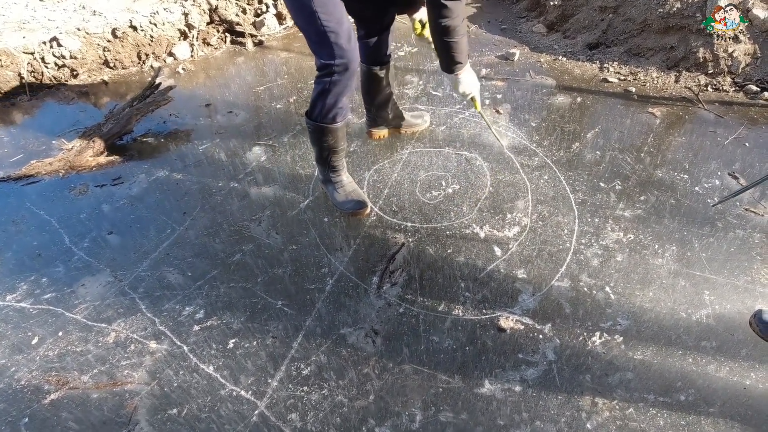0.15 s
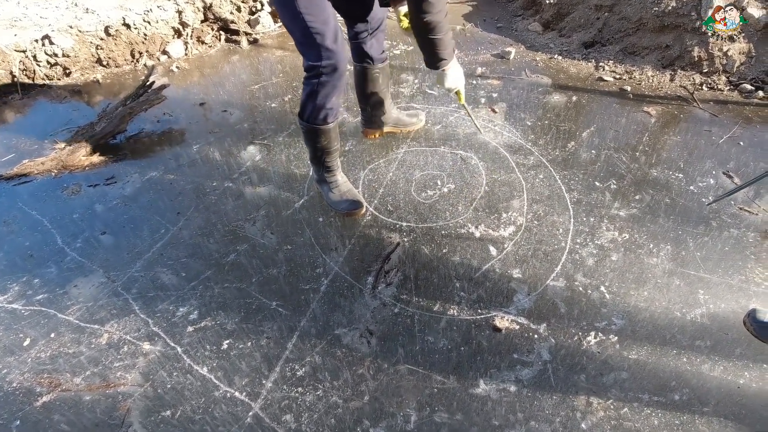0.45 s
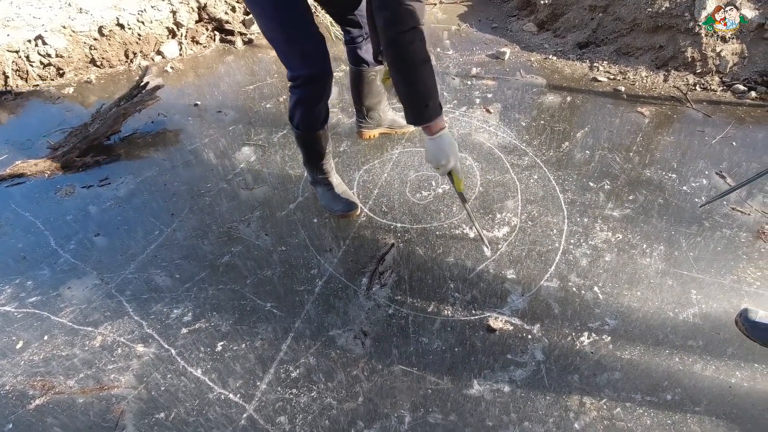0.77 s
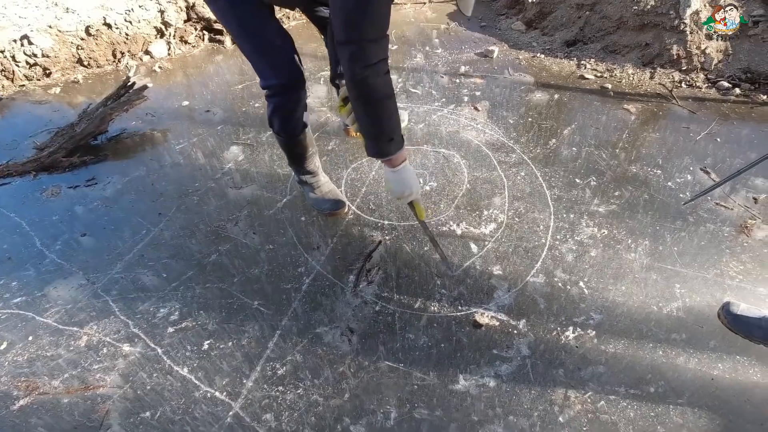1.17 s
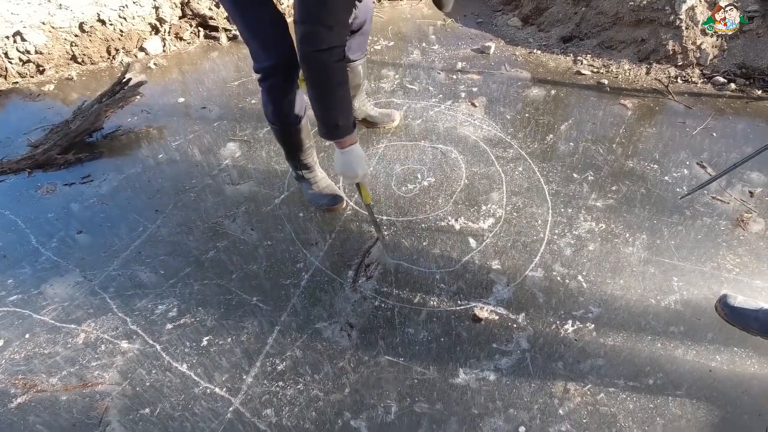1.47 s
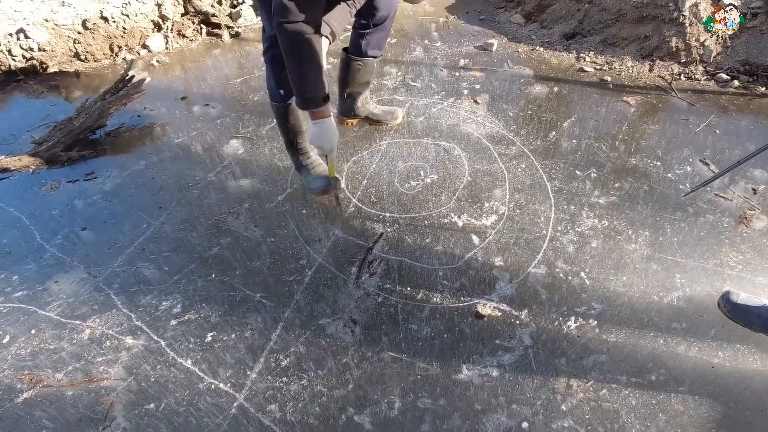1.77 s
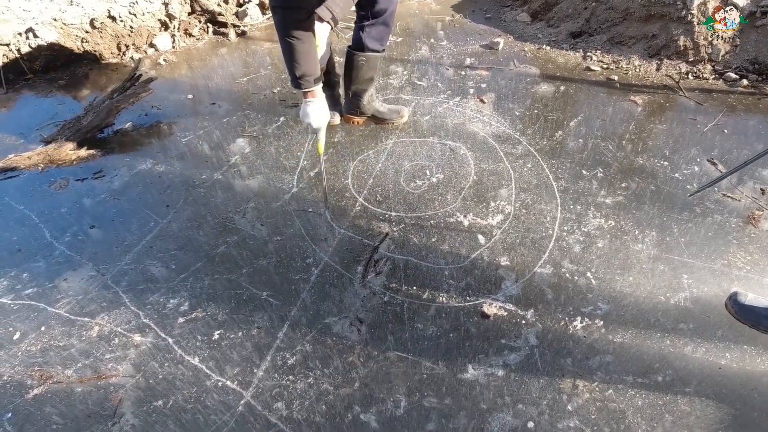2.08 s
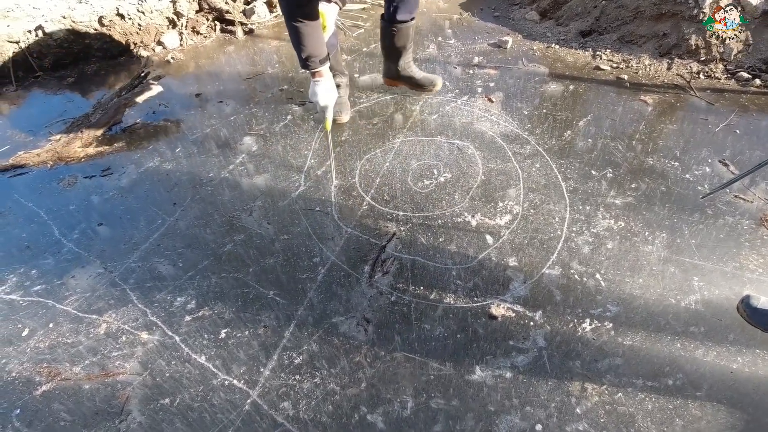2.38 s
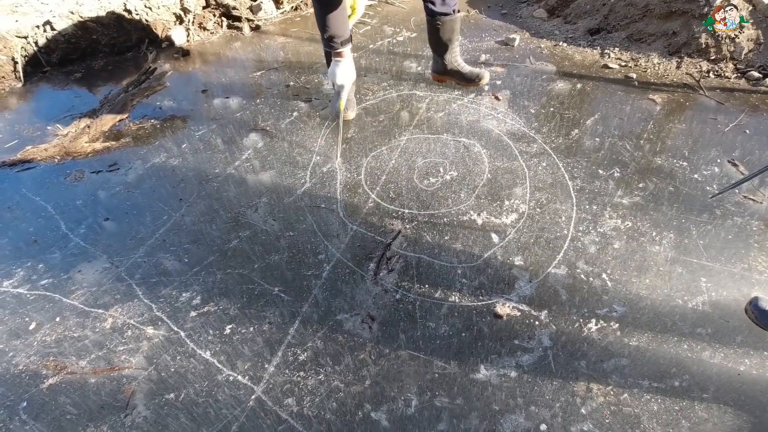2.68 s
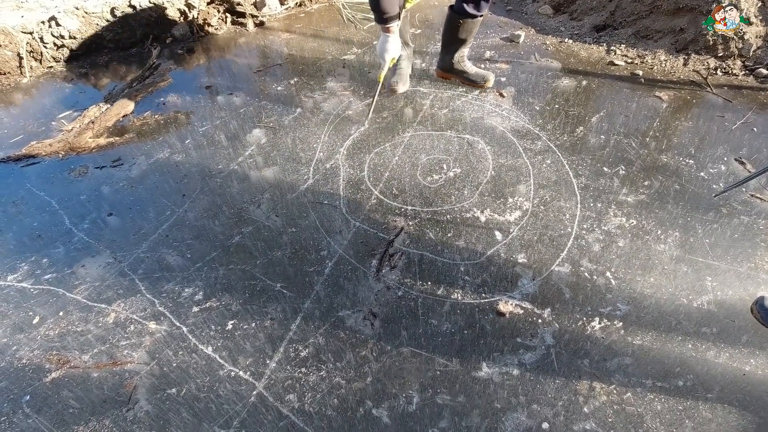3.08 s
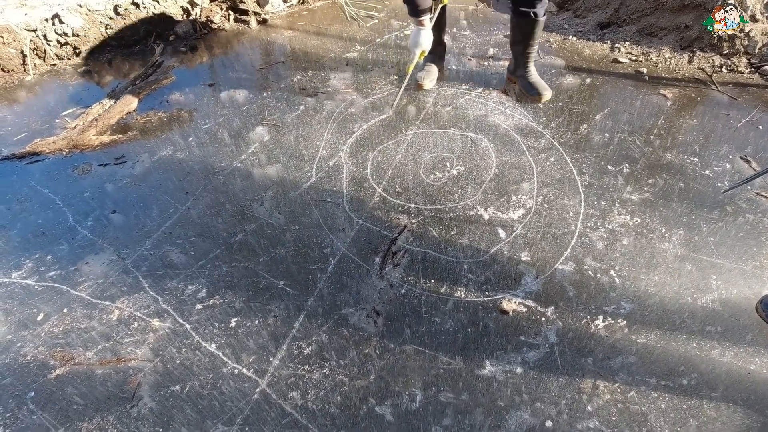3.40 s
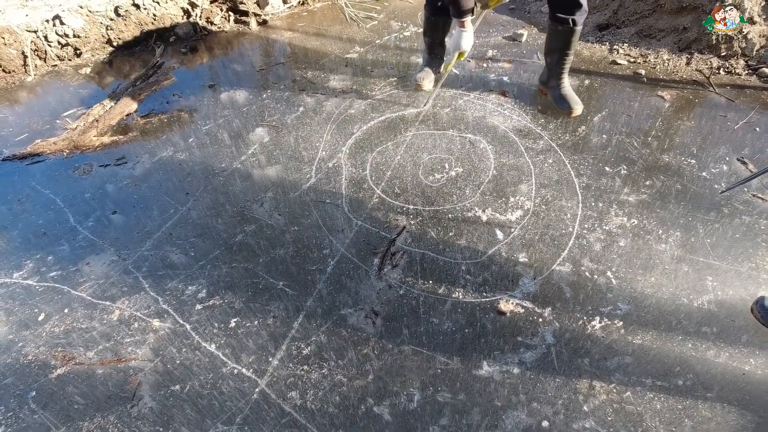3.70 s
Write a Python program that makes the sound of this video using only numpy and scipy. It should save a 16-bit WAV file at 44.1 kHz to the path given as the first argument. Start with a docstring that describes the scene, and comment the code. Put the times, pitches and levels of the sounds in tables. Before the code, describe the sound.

A metal rod rasps over pond ice in a short stuttering stroke, pauses, then scrapes again and runs into a long stroke, with sharp catches and boot thuds; outdoors, microphone a few metres away.

```python
"""Metal rod scoring a circle into pond ice in three strokes, outdoors, a few metres away.
Rasp: random grain fractures, partly gated into quick skips, through rod-and-ice resonances; hard catches on top.
Sheet: low-filtered fractures. Boots: filtered noise thuds and one falling heel knock.
Around it: two decaying noise echoes of the rod, light wind, distant air and faint gurgling sine blips."""
import sys
import numpy as np
from scipy import signal
from scipy.fft import rfft, irfft
from scipy.io import wavfile
from scipy.ndimage import uniform_filter1d

SR = 44100
rng = np.random.default_rng(int(sys.argv[2]) if len(sys.argv) > 2 else 0)


def to_wav(sig):
    """Store sig (one row per channel, or 1-D mono) as 16-bit WAV at the path in sys.argv[1].

    Samples outside -1..1 are clipped; the rate is SR.
    """
    pcm = np.clip(np.atleast_2d(sig), -1, 1) * 32767
    pcm = np.round(pcm).astype(np.int16)
    wavfile.write(sys.argv[1], SR, pcm.T)  # frames by channels


N = 169785
TIME_S = np.arange(N) / SR
FFT_SIZE, HOP = 2048, 512
HZ = np.fft.rfftfreq(FFT_SIZE, 1 / SR)
FULL_HZ = np.fft.rfftfreq(N, 1 / SR)
FRAME_S = np.arange(-(-N // HOP) + 1) * HOP / SR

# rasp, one table per stroke: t/s, level/dB, treble relative to it/dB
STROKE_LEVELS = [
    [(0.0, -27.5, -15), (0.006, -28.5, -0.5), (0.106, -26.5, -7), (0.194, -22, -1), (0.208, -27, -2),
     (0.234, -30, -6), (0.25, -18.5, -7), (0.316, -22, -5.5), (0.322, -27, -7), (0.36, -24, 0.5),
     (0.39, -31.5, 2), (0.396, -31.5, -2), (0.446, -29, 0), (0.48, -25, -10), (0.53, -63.5, 4)],
    [(1.218, -37, -28), (1.232, -37.5, -14), (1.242, -44, -9), (1.26, -28, -8), (1.274, -53, -4),
     (1.292, -31.5, -6), (1.394, -24.5, -3), (1.576, -30.5, -1.5), (1.71, -27.5, -2.5), (1.716, -22.5, 9.5),
     (1.736, -55, 4), (1.76, -53, 4)],
    [(1.79, -54, 6), (1.82, -29.5, -4.5), (1.85, -33, -2), (1.89, -27, -2), (2.05, -32.5, -5),
     (2.06, -35, -4), (2.19, -32.5, -5), (2.24, -37.5, -0.5), (2.33, -26.5, -5), (2.34, -31.5, 0),
     (2.48, -30.5, -6), (2.49, -26, -4), (2.62, -34, 3), (2.7, -27.5, -7), (2.8, -28.5, -5),
     (2.9, -24.5, -7.5), (3.03, -27, -8), (3.14, -24.5, -6.5), (3.33, -30, -7), (3.41, -23.5, -6.5),
     (3.47, -30.5, -4), (3.5, -22.5, -13), (3.51, -25, -8.5), (3.71, -25, -1.5), (3.72, -29, 1.5),
     (3.85, -28, -1)],
]
# low drone of the ice sheet under the tip: t/s, level/dB
DRONE_LEVEL = [(0, -39), (.09, -43), (.3, -43), (.48, -48), (.56, -65.5), (1.2, -67), (1.24, -46),
               (1.36, -41), (1.71, -37), (1.77, -58), (1.83, -41), (2.25, -41.5), (2.9, -39.5), (3.85, -40)]
# share of the rasp's power in skips: t/s, share/0-1
SKIP_SHARE = [(0, 0.8), (.42, .95), (.49, 0.6), (1.3, .55), (1.42, 0.36), (1.62, 0.67), (1.9, 0.3),
              (2.05, .15), (2.2, 0.52), (2.4, .5), (2.6, .92), (2.76, .38), (2.95, .25), (3.17, .42),
              (3.25, 0.79), (3.5, 0.76), (3.64, 0.63), (3.8, 0.86)]
# tip on its circle: t/s, place/0 right - 1 left
TIP_PLACE = [(0, 0.018), (.5, 0.087), (1.25, .2), (1.65, 0.55), (2.1, 1), (2.8, 0.88), (3.3, 0.78),
             (3.6, 0.23), (3.85, 0.18)]
# rasp colour at the right of the circle: f/Hz, level/dB
RIGHT_COLOUR = [(500, -25), (1000, -7.5), (1400, -2), (3000, -2), (4600, -3.5), (5700, -2.5), (6450, -0.5),
                (7100, -7.5), (8200, -13.5), (9300, -5), (10400, -1), (11500, -9), (13000, -13),
                (16000, -18.5)]
# rasp colour at the left of the circle: f/Hz, level/dB
LEFT_COLOUR = [(500, -19), (950, -8), (1200, -1), (2700, 0), (3900, 0), (4800, -2), (6200, -6),
               (7200, -15.5), (9000, -18), (10000, -13.5), (11000, -6), (12000, -13), (13600, -13),
               (16000, -23.5)]
# steady ringing of rod on ice: f/Hz, width/Hz, lift/dB
ROD_RINGS = [(1154, 50, 0), (1506, 30, 1), (1762, 17, -2), (2000, 60, 3.5), (2680, 50, 2), (3000, 74, 2.5),
             (3830, 70, 3), (5380, 60, 2.5), (6470, 150, 0)]
# passing resonances as grip and angle change: t/s, spread/s, f/Hz, width/Hz, lift/dB, glide/(Hz/s)
PASSING_RINGS = [(.2, .3, 6400, 350, 7, 2.5), (.27, .09, 3160, 900, 6.5, 0),
                 (0.485, 0.036, 3860, 350, 15.5, 2), (1.692, .06, 3000, 300, 10, -1),
                 (1.876, 0.1, 1190, 180, 12.5, 2), (1.948, 0.082, 2110, 250, 5, 0),
                 (2.33, 0.044, 3450, 300, 10, 0), (2.62, 0.29, 2540, 220, 3, 0),
                 (3.02, 0.41, 2690, 260, 7, 750), (3.42, 0.098, 2950, 350, 5.5, 0),
                 (2.87, 0.24, 5370, 120, 6, 0), (3.703, .16, 5550, 500, 10, 3000),
                 (3.63, 0.11, 1680, 260, 5.5, 1200)]
# ice sheet resonances: f/Hz, relative level/dB
SHEET_COLOUR = [(40, -25.5), (90, -6), (130, -6), (200, -12), (270, -10.5), (320, 1), (395, 1.5), (470, -4),
                (650, -3), (900, -7), (1400, -10.5), (4000, -63.5)]
# left-right correlation: f/Hz, likeness/0-1
STEREO_LIKENESS = [(60, 0.98), (150, 0.98), (350, 0.99), (600, 0.95), (1200, .98), (2500, 1), (4500, 0.61),
                   (6500, 0.65), (8000, .45), (10500, 0.96), (13000, .5), (16000, .45)]
# tip catches and breaks out a chip: t/s, relative strength/dB
CHIP_CATCHES = [(0.0887, -7), (0.0957, -10), (0.189, -6), (0.1995, -6), (0.2369, -5.5), (0.2506, -1.5),
                (0.263, -6), (0.2666, -9.5), (0.2787, -8.5), (0.3015, -11), (0.3419, -9.5), (0.3634, -9),
                (0.3758, -11.5), (0.4329, -12), (0.476, -15), (1.13, -32), (1.22, -27), (1.256, -14.5),
                (1.5334, -9.5), (1.715, -7.5), (2.4897, -11), (2.5163, -13.5), (2.545, -13), (2.5643, -10),
                (2.6098, -10.5), (2.6493, -12.5), (3.222, -15), (3.236, -11), (3.4047, -3.5),
                (3.4183, -8.5), (3.48, -9), (3.5397, -3), (3.5608, -10.5), (3.785, -6)]
# boots on the ice: t/s, level/dB, f/Hz, width/Hz, rise/s
BOOT_STEPS = [(0.074, -28, 662, 400, 0.011), (0.571, -30, 60, 60, 0.0057), (0.647, -34.5, 712, 130, 0.0067),
              (2.103, -29, 380, 400, 0.0041), (2.22, -32, 59.4, 70, 0.011), (2.729, -22, 80, 149, 0.0086),
              (3.309, -26, 600, 900, 0.0033)]
# distant air: f/Hz, relative level/dB
AIR_COLOUR = [(60, -17), (110, -4.5), (190, -10), (260, -5), (370, -2), (540, -13), (900, -10), (1250, -21),
              (1900, -24), (3900, -30), (6000, -35.5), (9000, -45), (12500, -52), (16000, -65.5)]
# wind: f/Hz, relative level/dB
WIND_COLOUR = [(15, -1.5), (35, 2), (70, -4.5), (120, -15), (250, -30), (800, -73.5)]
# wind strength: t/s, level/dB
WIND_STRENGTH = [(0, -41), (.45, -42), (.7, -51), (1.2, -50), (1.5, -62), (2.1, -53.5), (2.5, -41),
                 (2.85, -46), (3.28, -46.5), (3.35, -35), (3.42, -53), (3.54, -42), (3.65, -54.5)]
# reflections: f/Hz, relative level/dB
REFLECTION_COLOUR = [(300, 0.5), (3500, -1.5), (7000, -4.5), (15000, -18)]

GRAINS_PER_S, GRAIN_SPREAD_DB, GRAIN_CAP = 14000, 3.5, 4.76  # cap in multiples of the spread
SPLINTERS_PER_S, SPLINTER_DB = 45, 14  # sharp snaps, relative to grain rms
SKIPS_PER_S, SKIP_JITTER, SKIP_WIDTH_S, SKIP_SPREAD_DB = 112, 0.24, 0.0012, 2
RIPPLE_DB, RIPPLE_HZ, RIPPLE_S = 1.8, 90, 0.19  # fine colour ripple, drifting as the tip moves
PATCH_DB, PATCH_HZ, PATCH_S = 2.0, 460, 0.081  # broader, quicker contact changes
LEAD_RIGHT_S, LEAD_LEFT_S = -0.0069e-3, 0.037e-3  # left microphone's lead
LEAD_TOP_HZ = 9000  # camera body stops the phase difference growing above this
STICK_S, STICK_DEPTH = 0.007, 0.7
CATCH_DB, CATCH_RISE_S, CATCH_FADE_S = -6, 0.0018, 0.0023
# below SOFT_DB of listed strength, treble falls by DULLING dB per dB
CATCH_TREBLE_DB, SOFT_DB, DULLING = -3, -14, 1
ECHO_DB, ECHO_T60_S, BANK_DB, BANK_T60_S = -16.5, 0.045, -23, 0.3
BLIPS_PER_S, BLIP_DB, BLIP_LOW_HZ, BLIP_HIGH_HZ, BLIP_S = 60, -54.5, 600, 1060, 0.0041
AIR_DB = -54
KNOCK_S, KNOCK_DB, KNOCK_RISE_S = 3.491, -17.5, 0.006
KNOCK_FIRST_HZ, KNOCK_LAST_HZ, KNOCK_GRIT = 168, 110, 0.3
EDGE_HZ = 15950


def amp(db):
    """Decibels to gain."""
    return 10 ** (np.asarray(db) / 20)


def unit(x):
    """Scale to rms 1."""
    return x / np.sqrt(np.mean(x ** 2) + 1e-20)


def curve(rows, t, axis=1):
    """Interpolate one table column over time."""
    rows = np.array(rows, float)
    return np.interp(t, rows[:, 0], rows[:, axis])


def shape(rows, hz):
    """Interpolate a table over log frequency."""
    f, value = np.transpose(rows)
    return np.interp(np.log(hz + 1), np.log(f + 1), value)


def tinted(x, rows):
    """Filter by a spectrum, to rms 1."""
    return unit(irfft(rfft(x) * amp(shape(rows, FULL_HZ)), N))


def pair(x):
    """Mix two independent signals to the left-right correlation at each frequency."""
    same = np.clip(shape(STEREO_LIKENESS, FULL_HZ), 0, 1)
    mid, side = rfft(x) * np.sqrt([(1 + same) / 2, (1 - same) / 2])
    return irfft(np.array([mid + side, mid - side]), N)


def grains():
    """Dense tiny fractures of uneven size and random sign, with a few sharp splinters."""
    fires = rng.random(N) < GRAINS_PER_S / SR
    size_db = GRAIN_SPREAD_DB * np.minimum(rng.exponential(1, N), GRAIN_CAP)
    size = unit(amp(size_db) * fires)
    size = size + amp(SPLINTER_DB) * (rng.random(N) < SPLINTERS_PER_S / SR)
    return unit(size * rng.choice([-1., 1.], (2, N)))


def skipping(count=700):
    """Stick-slip: the tip bites in short uneven bursts, blended with steady ploughing."""
    gap, size, width = np.clip(rng.standard_normal((count, 3)), -2, 2).T
    gaps_s = np.exp(SKIP_JITTER * gap) / SKIPS_PER_S
    gains = amp(SKIP_SPREAD_DB * size) * np.sqrt(gaps_s)  # longer wait, harder bite
    widths_s = SKIP_WIDTH_S * np.exp(0.19 * width)
    power = np.zeros(N)
    for s, gain, w in zip(np.cumsum(gaps_s), gains, widths_s):
        near = slice(*np.searchsorted(TIME_S, [s - 10 * w, s + 10 * w]))
        power[near] += gain ** 2 * np.exp(-0.5 * abs((TIME_S[near] - s) / w) ** 2.45)
    # level out the local mean power
    local = uniform_filter1d(uniform_filter1d(power, size=1500), size=1500)
    power /= abs(local) + 1e-12
    share = np.clip(curve(SKIP_SHARE, TIME_S), 0, 0.98)
    return np.sqrt(1 - share + share * power)


def ripple(width_hz, length_s):
    """Smooth random field over frames and frequency, rms 1."""
    z = rng.standard_normal((len(FRAME_S), len(HZ)))
    per_s = np.fft.fftfreq(len(FRAME_S), FRAME_S[1])[:, None]
    per_hz = np.fft.rfftfreq(len(HZ), HZ[1])
    smooth = np.exp(-2 * (per_s * length_s) ** 2) / (1 + (per_hz * width_hz) ** 2)
    return unit(np.fft.irfft2(np.fft.rfft2(z) * smooth, z.shape))


def rod_colour(x, treble_db):
    """Rod-and-ice resonances; colour and arrival time follow the tip round its circle."""
    place = np.clip(curve(TIP_PLACE, FRAME_S), 0, 1)[:, None]
    db = (1 - place) * shape(RIGHT_COLOUR, HZ) + place * shape(LEFT_COLOUR, HZ)
    db = db + RIPPLE_DB * ripple(RIPPLE_HZ, RIPPLE_S)
    db = db + PATCH_DB * ripple(PATCH_HZ, PATCH_S)
    for hz, width, lift_db in ROD_RINGS:
        db = db + lift_db / (1 + (2 * (HZ - hz) / width) ** 2)
    for s, spread, hz, width, lift_db, glide in PASSING_RINGS:
        t = FRAME_S[:, None] - s
        resonance = 1 / (1 + (2 * (HZ - hz - glide * t) / width) ** 2)
        db = db + lift_db * np.exp(-2 * (t / spread) ** 2) * resonance
    gain = amp(db) * (HZ + 10) ** 2 / (HZ ** 2 + 350 ** 2)  # bass roll-off

    # body and treble normalised apart, crossfading over 6-8.5 kHz
    body, top = (HZ > 1000) & (HZ < 7000), HZ > 8000
    body_rms = np.sqrt(np.mean((gain * body) ** 2, 1, keepdims=True))
    top_rms = np.sqrt(np.mean((gain * top) ** 2, 1, keepdims=True))
    upper = np.clip((HZ - 6000) / 2500, 0, 1)
    treble_gain = amp(treble_db)[:, None] / top_rms
    log_gain = np.log(gain) - (1 - upper) * np.log(body_rms) + upper * np.log(treble_gain)

    # minimum phase by folding the cepstrum
    fold = np.r_[1, np.full(len(HZ) - 2, 2), 1, np.zeros(len(HZ) - 2)]
    causal = np.exp(rfft(irfft(log_gain) * fold))
    lead_s = LEAD_RIGHT_S + place * (LEAD_LEFT_S - LEAD_RIGHT_S)
    turn = np.exp(1j * np.pi * np.minimum(HZ, LEAD_TOP_HZ) * lead_s)  # half the lead per side
    z = signal.stft(pair(x), nperseg=FFT_SIZE, noverlap=FFT_SIZE - HOP)[2]
    z = z * np.array([(causal * turn).T, (causal / turn).T])
    return signal.istft(z, nperseg=FFT_SIZE, noverlap=FFT_SIZE - HOP)[1][:, :N]


def scrape(bite):
    """Rasp of the three strokes: coloured fractures, stalling where the tip catches."""
    level = np.zeros(N)
    for rows in STROKE_LEVELS:
        active = (TIME_S >= rows[0][0]) & (TIME_S <= rows[-1][0])
        level += amp(curve(rows, TIME_S)) * active
    # each stall centres 2 ms before its catch
    stalls = [np.exp(-np.minimum(((TIME_S - s + 0.002) / STICK_S) ** 2, 30)) for s, _ in CHIP_CATCHES]
    level = level * (1 - STICK_DEPTH * np.max(stalls, 0))
    treble_db = curve(np.vstack(STROKE_LEVELS), FRAME_S, axis=2)
    return rod_colour(grains() * bite * level, treble_db)


def sheet(bite):
    """Fractures in the same skips drive the low resonances of the ice sheet."""
    return tinted(pair(grains() * bite), SHEET_COLOUR) * amp(curve(DRONE_LEVEL, TIME_S))


def echo(x, t60_s):
    """Reflections: convolution with exponentially decaying coloured noise."""
    t = np.arange(SR // 2) / SR
    noise = tinted(pair(rng.standard_normal((2, N))), REFLECTION_COLOUR)[:, :len(t)]
    tail = noise * amp(-60 * t / t60_s) * (t > 0.002)
    return signal.fftconvolve(x, tail / np.linalg.norm(tail[0]), axes=1)[:, :N]


def blips(count=360):
    """Faint gurgle, perhaps water trickling at the bank: short sine blips at random times."""
    out = np.zeros(N)
    gap, pitch, size = rng.random((count, 3)).T
    starts_s = np.cumsum(2 * gap) / BLIPS_PER_S
    pitches_hz = BLIP_LOW_HZ * (BLIP_HIGH_HZ / BLIP_LOW_HZ) ** pitch
    gains = amp(BLIP_DB + 10 * (size - 0.5))
    for s, hz, gain in zip(starts_s, pitches_hz, gains):
        near = slice(*np.searchsorted(TIME_S, [s, s + 10 * BLIP_S]))
        t = TIME_S[near] - s
        envelope = t / BLIP_S * np.exp(1 - t / BLIP_S)
        out[near] += gain * envelope * np.sin(2 * np.pi * hz * t)
    return out


def outdoors():
    """Steady distant air, and low wind noise buffeting each microphone, partly shared."""
    air = amp(AIR_DB) * tinted(pair(rng.standard_normal((2, N))), AIR_COLOUR)
    gusts = rng.standard_normal((3, N))
    wind = tinted(gusts[:2] + 0.45 * gusts[2], WIND_COLOUR)
    return air + wind * amp(curve(WIND_STRENGTH, TIME_S))


def boots():
    """Resonant noise scuffs and thuds, and one heel knock booming through the sheet as its pitch falls."""
    out = np.zeros((2, N))
    scuff = rfft(pair(rng.standard_normal((2, N))))
    for s, db, hz, width, rise_s in BOOT_STEPS:
        u = np.maximum(TIME_S - s, 0) / rise_s
        push = irfft(scuff / (1 + (2 * (FULL_HZ - hz) / width) ** 2), N) * u * np.exp(-u)
        out += amp(db) * push / np.sqrt(np.sum(push ** 2) / (rise_s * SR))
    u = np.maximum(TIME_S - KNOCK_S, 0) / KNOCK_RISE_S
    knock_hz = KNOCK_LAST_HZ + (KNOCK_FIRST_HZ - KNOCK_LAST_HZ) * np.exp(-u / 2)
    turns = np.cumsum(knock_hz * (u > 0)) / SR
    grit = unit(uniform_filter1d(irfft(scuff, N), size=50))
    envelope = u ** 2 * np.exp(2 - 2 * u)
    return out + amp(KNOCK_DB) * envelope * (np.sin(2 * np.pi * turns) + KNOCK_GRIT * grit)


def catches():
    """Single hard bites: short grain bursts through the rod; light touches are duller."""
    level, t = np.zeros(N), TIME_S[:2000]
    burst = np.minimum(t / CATCH_RISE_S, 1) * np.exp(-t / CATCH_FADE_S)
    for s, db in CHIP_CATCHES:
        level[round(s * SR):][:len(t)] += amp(db + CATCH_DB) * burst
    softness_db = np.minimum(curve(CHIP_CATCHES, FRAME_S) - SOFT_DB, 0)
    return rod_colour(grains() * level, CATCH_TREBLE_DB + DULLING * softness_db)


def scene():
    """Rod with short reflections and a longer tail from the banks; boots, gurgle and air stay dry."""
    bite = skipping()
    rod = scrape(bite) + catches() + sheet(bite)
    near_echo = amp(ECHO_DB) * echo(rod, ECHO_T60_S)
    bank_echo = amp(BANK_DB) * echo(rod, BANK_T60_S)
    return rod + near_echo + bank_echo + boots() + blips() + outdoors()


def record(dry):
    """Linear-phase low-pass at EDGE_HZ."""
    lowpass = signal.firwin(601, EDGE_HZ, window=("kaiser", 9), fs=SR)
    return signal.oaconvolve(dry, lowpass[None], "same")


dry = scene()
out = record(dry)
to_wav(out)
```